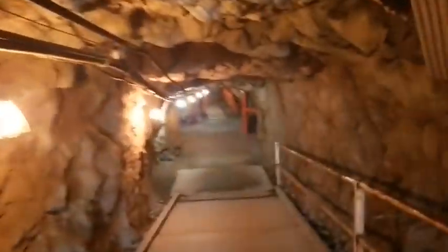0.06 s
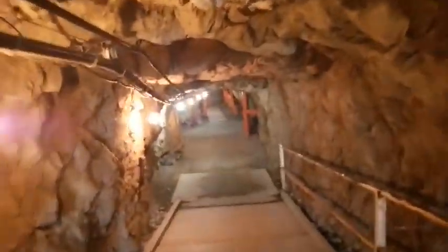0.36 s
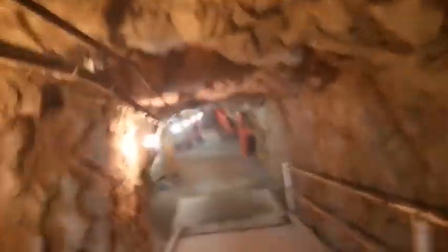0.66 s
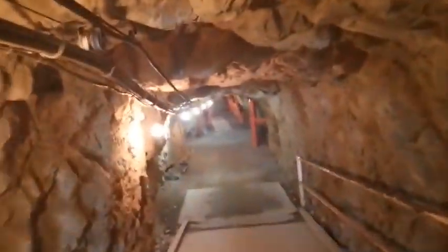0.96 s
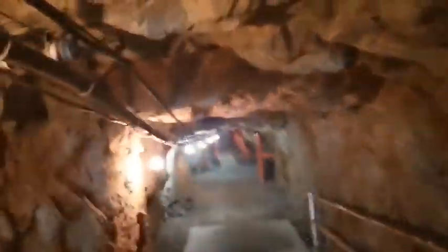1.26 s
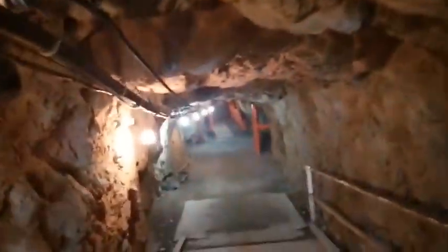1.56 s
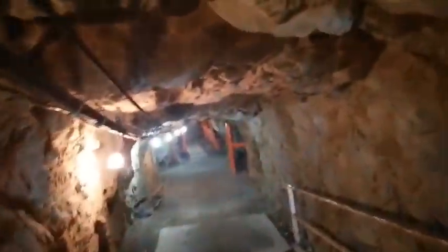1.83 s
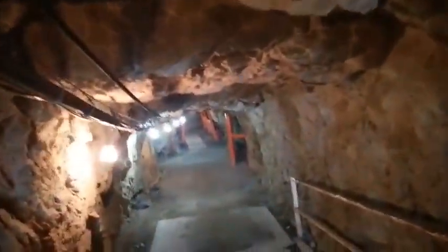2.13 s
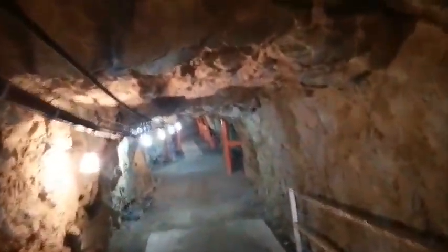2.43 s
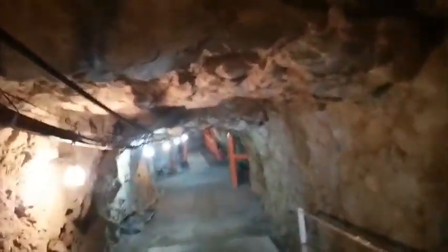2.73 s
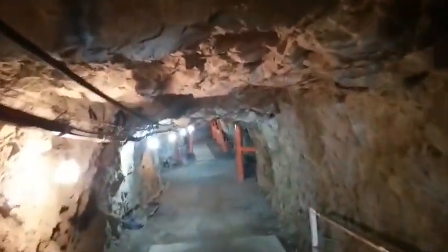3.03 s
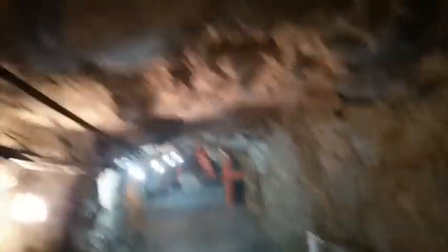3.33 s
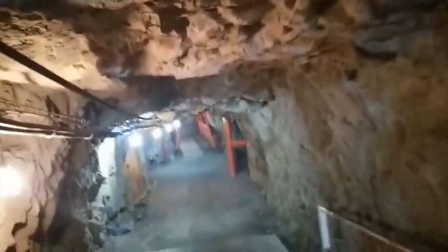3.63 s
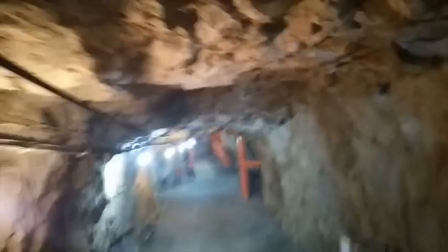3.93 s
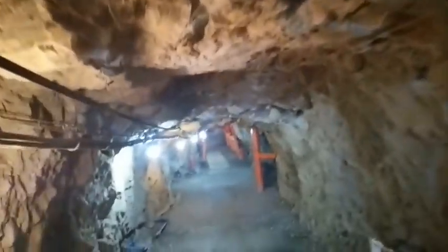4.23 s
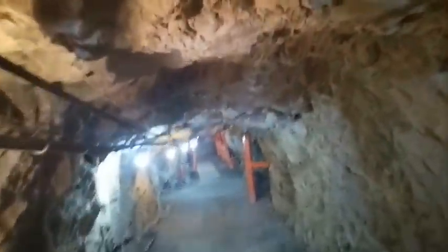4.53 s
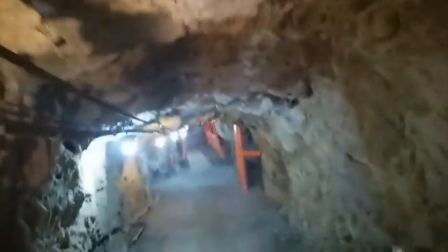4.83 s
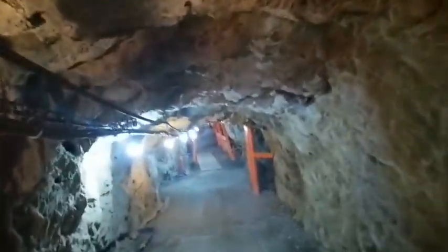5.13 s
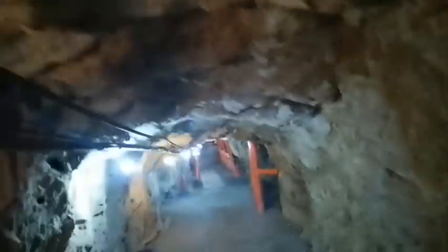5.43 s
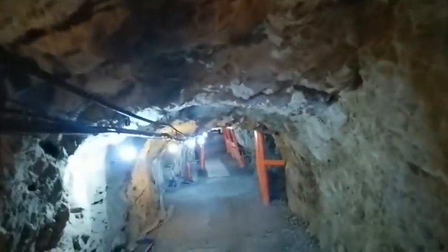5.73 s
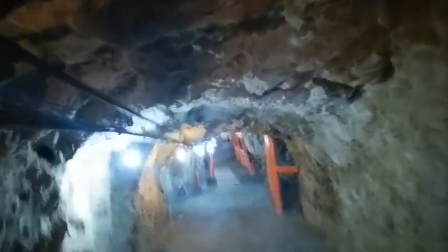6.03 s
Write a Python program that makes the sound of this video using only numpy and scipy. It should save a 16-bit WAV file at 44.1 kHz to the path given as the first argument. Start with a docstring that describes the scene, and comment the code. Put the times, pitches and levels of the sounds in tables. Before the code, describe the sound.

Heavy, fluttering handling rumble surges on a carried microphone in time with about nine footsteps going down a tunnel stairway. The steps thud dully and the treads clack, most sharply in the first half, with small gritty scrapes in between. A short reflection from the rock follows each step. Faint clothing swishes and a quiet, hollow wash of air lie underneath.

```python
"""Footsteps on tunnel stairs

Someone carrying a camera walks down stair treads in a rock tunnel. Each footfall thuds, treads clack,
soles scuff on grit and clothes rustle; the rock reflects the steps. Every stride shakes the camera:
the slow wobble overloads its left microphone, and a fast limiter chops the sound in time with it."""
import sys
import numpy as np
from scipy import signal
from scipy.fft import rfft, irfft
from scipy.io import wavfile
from scipy.ndimage import uniform_filter1d

SR = 44100
rng = np.random.default_rng(int(sys.argv[2]) if len(sys.argv) > 2 else 0)


def master_out(mix):
    """Clip the mix to full scale and print it as 16-bit PCM to the path in sys.argv[1]."""
    frames = np.transpose(np.atleast_2d(mix))
    ceiling = np.clip(frames, -1, 1)
    pcm = np.round(ceiling * 32767).astype(np.int16)
    wavfile.write(sys.argv[1], SR, pcm)


N = 268431
TIME = np.arange(N) / SR

# Weight landing on a foot. Each row: start in seconds, level in dB, pitch in Hz, decay in seconds.
FOOT_IMPACTS = [(0.509, -25.5, 84.2, 0.11), (0.597, -17, 114.5, 0.021), (1.161, -24, 101, 0.037),
                (1.772, -38, 118, 0.14), (1.889, -20, 124.5, 0.015), (2.491, -42.5, 104, 0.037),
                (2.616, -16, 97, 0.0074), (3.201, -8.5, 92, 0.0072), (3.256, -17, 97, 0.023),
                (3.886, -16, 89.7, 0.02), (3.992, -22, 115.6, 0.029), (4.115, -29, 108, 0.026),
                (4.552, -17.5, 84, 0.022), (4.641, -18, 84, 0.022), (5.258, -24, 106.1, 0.1),
                (5.997, -17.5, 97.5, 0.025)]
# A tread knocking on its frame. Each row: start in seconds, level in dB, crack decay in seconds,
# lower and upper band edges in Hz, left over right in dB.
TREAD_KNOCKS = [(0.597, -8, 0.0025, 170, 3100, -6.5), (0.605, -9.5, 0.002, 200, 3400, -1),
                (1.898, -9, 0.0032, 306, 2400, -0.5), (1.903, -8, 0.0046, 1180, 2470, -8.5),
                (1.96, -31, 0.011, 790, 2210, -12), (2.621, -27, 0.0021, 297, 2350, -10),
                (3.278, -10, 0.0058, 302, 2800, -5.5), (3.306, -16.5, 0.0095, 406, 3070, -2.5),
                (3.356, -25, 0.0045, 605, 2940, -1), (1.246, -20.5, 0.061, 247, 770, 8),
                (4.002, -21.5, 0.01, 250, 680, 1), (4.647, -22.5, 0.006, 200, 2600, -8),
                (4.708, -16, 0.00076, 385, 2860, 8), (5.345, -21.5, 0.036, 287, 830, 2.5)]
# The crack of a knock. Each row: frequency in Hz, spectral level in dB.
CRACK_SPECTRUM = [(200, 14.5), (400, 0.5), (650, -1), (1000, -7), (1700, 0), (2700, -5.5), (4000, -3),
                  (8000, -5)]
# Modes of a tread. Each row: frequency in Hz, level in dB, 60 dB decay time in seconds.
TREAD_MODES = [(355.4, 6.5, 0.15), (524, 1, 0.14), (631, 17, 0.099), (845, 3.5, 0.27), (1190, -37, 0.09),
               (1450, -36, 0.15), (1595, -34, 0.13), (1790, 1, 0.071), (1600, -34, 0.12), (1750, -4, 0.39),
               (1980, -18, 0.22), (2420, -16, 0.2), (2570, -15, 0.12), (2807, 9.5, 0.11), (3680, 10, 0.22)]
# Grit under a sole. Each row: start in seconds, level in dB, decay in seconds, resonance in Hz,
# treble trim in dB, left over right in dB.
GRIT_SCUFFS = [(0.226, -25, 0.003, 860, -8, -0.5), (0.524, -39, 0.029, 3100, -5, -17),
               (0.840, -34, 0.012, 3070, -6, -13.5), (0.902, -17, 0.00069, 1070, -13.5, -5.5),
               (1.5, -29.5, 0.0019, 2200, -5, -2), (1.541, -43.5, 0.015, 10600, -20, 6),
               (1.602, -45.5, 0.052, 2730, -12, -15), (1.687, -15, 0.0017, 2470, -27, -7.5),
               (1.745, -42, 0.02, 3570, -43, -14), (1.815, -8.5, 0.0031, 2460, 0, -8.5),
               (2.896, -21.5, 0.0035, 2770, 1, -5.5), (2.897, -29.5, 0.0065, 3630, -8, -21),
               (4.270, -59.5, 0.072, 3900, -18, -17), (4.429, -33.5, 0.011, 3670, 2, -12.5),
               (4.519, -47, 0.15, 2960, -33, -13.5), (5.306, -30, 0.0073, 3230, 4.5, -12.5),
               (5.311, -30.5, 0.019, 4260, 2.5, -7.5)]
# Small hard parts. Each row: start in seconds, level in dB, pitch in Hz, ring time in seconds.
PART_TICKS = [(0.739, -5.5, 7030, 0.004), (0.741, -7.5, 4080, 0.01)]
# Strides jolting the camera. Each row: start in seconds, swing in dB, rise in seconds,
# jolted and settling rates in Hz, fade in dB per second.
CAMERA_JOLTS = [(-0.174, -5.5, 0.21, 6.67, 7.4, 54.5), (0.301, -3.5, 0.13, 11.1, 10.3, 37.5),
                (0.484, 7.5, 0.13, 8.53, 8.35, 51.5), (1.191, 11.5, 0.0696, 10.85, 8.05, 94.5),
                (1.655, -12, 0.033, 9.7, 6, 27), (1.914, 0, 0.047, 8.8, 9.3, 50),
                (2.499, 2, 0.21, 7.76, 7.9, 195), (2.939, -11, 0.081, 9, 4.9, 350),
                (3.215, 4.5, 0.059, 10.1, 8.56, 37), (3.899, 6.5, 0.089, 9.5, 7.7, 76.5),
                (4.555, 8, 0.13, 9.72, 7.93, 71), (5.276, 11, 0.064, 10.1, 8.2, 92),
                (5.996, -5.5, 0.064, 8, 8, 65.5)]
# Fingers shifting on the camera. Each row: centre in seconds, level in dB, half length in seconds.
FINGER_SHIFTS = [(0.35, 7, 0.015), (1.66, -7.5, 0.037), (2.42, -6, 0.019), (3.07, -20, 0.018)]
# Rumble of the grip. Each row: frequency in Hz, spectral level in dB.
GRIP_SPECTRUM = [(5, -10.5), (20, 2), (40, -7.5), (70, -14.5), (120, -20.5), (200, -31.5), (400, -47),
                 (1500, -60), (6000, -100)]
# The legs passing each other. Each row: centre in seconds, level in dB, half length in seconds.
LEG_SWISHES = [(0.08, 5.5, 0.069), (0.27, 6.5, 0.14), (0.53, 11.5, 0.086), (1.576, 1.5, 0.24),
               (2.43, -1, 0.84), (2.75, 12.5, 0.12), (3.4, 0, 0.25), (4.29, 1.5, 0.39), (4.746, 10, 0.12),
               (5.07, 1, 0.12), (5.62, -0.5, 0.33)]
# Hollow bands of a swish. Each row: centre in Hz, width in Hz, level in dB.
HOLLOW_BANDS = [(2710, 560, -7), (5180, 550, -11)]
# Hiss of cloth. Each row: frequency in Hz, spectral level in dB.
CLOTH_SPECTRUM = [(500, -13), (950, -8), (1400, -14.5), (2000, -4.5), (2700, -4.5), (4100, -5.5),
                  (5350, -7.5), (6300, -7), (7800, 5), (10100, -3.5), (11900, -5.5), (15500, -14.5)]
# Direction of that hiss. Each row: frequency in Hz, left over right in dB.
CLOTH_BALANCE = [(1000, -21.5), (2500, -11.5), (4500, -14), (7500, -8), (10000, 0.5), (13000, 7)]
# Reverberation of the tunnel. Each row: frequency in Hz, 60 dB decay time in seconds.
TUNNEL_DECAY = [(100, 0.33), (300, 0.65), (800, 0.45), (2100, 0.39), (5500, 0.52), (12000, 0.39)]
# Wash of the tunnel air. Each row: frequency in Hz, spectral level in dB.
AIR_SPECTRUM = [(30, -27), (100, -6.5), (350, 5), (600, -3.5), (1000, -13), (2500, -18), (6000, -32),
                (15000, -31)]
# Likeness of the two microphones. Each row: frequency in Hz, coherence from 0 to 1.
MIC_COHERENCE = [(100, 0.97), (500, 0.61), (1000, 0.5), (2000, 0.24), (4000, 0.089)]


def footfalls():
    """Impact excitation: each foot drives a damped low boom, with a dull puff from the sole."""
    out, t = np.zeros(N), np.arange(SR // 3) / SR
    for s, db, hz, decay in FOOT_IMPACTS:
        boom = np.sin(2 * np.pi * hz * t)
        puff = unit_rms(band(rng.standard_normal(len(t)), 86, 178.4))
        sole = unit_rms(band(rng.standard_normal(len(t)), 420, 1020, order=1))
        push = (1 - np.exp(-(t / 0.0055) ** 2)) * np.exp(-t / decay)
        add(out, s, amp(db) * push * (0.92 * boom + amp(-6.5) * puff + amp(-29.5) * sole))
    return out


def tread_clacks():
    """Modal vibration: a tread hits its frame with a rattling crack and rings in its damped modes."""
    out, t = np.zeros((2, N)), np.arange(SR // 4) / SR
    colour = amp(curve(CRACK_SPECTRUM, np.fft.rfftfreq(len(t), 1 / SR)))
    for s, db, decay, low_hz, high_hz, pan_db in TREAD_KNOCKS:
        crack = irfft(rfft(mic_noise(len(t))) * colour, len(t)) * np.exp(-t / decay)
        phases = rng.uniform(0, 2 * np.pi, len(TREAD_MODES))
        ring = sum(amp(level) * 1e-3 ** (t / t60) * np.sin(2 * np.pi * hz * t + phase)
                   for (hz, level, t60), phase in zip(TREAD_MODES, phases))
        knock = 1.534 * crack + amp(-34.5) * np.array([-ring, ring])
        add(out, s, amp(db) * panned(pan_db) * band(knock, low_hz, high_hz, order=3))
    return out


def sole_scuffs():
    """Granular friction: uneven bursts of grit excite a broad resonance of the sole and a bright fizz."""
    out, t = np.zeros((2, N)), np.arange(SR // 3) / SR
    for s, db, decay, hz, treble_db, pan_db in GRIT_SCUFFS:
        grains = rng.standard_normal((2, len(t))) * amp(5.1 * rng.standard_normal(len(t)))
        grains = unit_rms(grains) * (1 - np.exp(-t / (0.54 * decay))) * np.exp(-t / decay)
        sole = band(grains, hz / 1.305, hz * 1.195)
        fizz = 0.33 * amp(treble_db) * band(grains, 3550, 9020, order=3)
        add(out, s, 4 * amp(db) * panned(pan_db) * (sole + fizz))
    return out


def part_ticks():
    """Free vibration: small hard parts ring briefly, close to the right microphone."""
    out, t = np.zeros(N), np.arange(SR // 10) / SR
    for s, db, hz, ring_s in PART_TICKS:
        envelope = (1 - np.exp(-t / 0.0001)) * 0.00078 ** (t / ring_s)
        add(out, s, amp(db) * envelope * np.sin(2 * np.pi * hz * t))
    return out * panned(-21.0) * amp(-6.5)


def camera_wobble(jolt_s=0.15, hold_s=0.1, handover_s=0.074, relax_s=0.75):
    """Damped oscillation: each jolt starts an infrasonic swing and a strain on the grip that relaxes."""
    swing, strain = np.zeros((2, N))
    next_jolts = [row[0] for row in CAMERA_JOLTS[1:]] + [TIME[-1]]
    for (s, db, rise_s, jolt_hz, settle_hz, fade_db_per_s), end in zip(CAMERA_JOLTS, next_jolts):
        age = np.maximum(TIME - s, 0)
        fade_db = fade_db_per_s * np.maximum(age - rise_s - hold_s, 0)
        width = np.minimum(age / rise_s, 1) ** 2 * amp(db - fade_db)
        width *= np.clip((end - TIME) / handover_s + 1, 0, 1)  # the next jolt stops this swing
        cycles = jolt_hz * np.minimum(age, jolt_s) + settle_hz * np.maximum(age - jolt_s, 0)
        swing += width * np.sin(2 * np.pi * cycles)
        strain += width * np.exp(-age / relax_s)
    return swing, strain


def camera_handling():
    """Structure-borne sound: the wobble and the grip's rumble reach mostly the left microphone."""
    swing, strain = camera_wobble()
    shared, right_only = unit_rms(coloured(rng.standard_normal((2, N)), GRIP_SPECTRUM))
    force = (0.16 + np.minimum(strain, 1.5) + swells(FINGER_SHIFTS)) * amp(3.64 * drift(hz=11))
    left = swing + amp(-18) * force * shared
    right = amp(-40.5) * swing + force * (amp(-50) * right_only - amp(-45.5) * shared)
    return np.array([left, right])


def cloth_rustle():
    """Friction noise: cloth rubs in an uneven hiss that swells and turns hollow as the legs pass."""
    hiss = unit_rms(coloured(rng.standard_normal((2, N)), CLOTH_SPECTRUM))
    hiss = np.array([coloured(channel, [(hz, side * db / 2) for hz, db in CLOTH_BALANCE])
                     for channel, side in zip(hiss, (1, -1))])
    rub = rng.standard_normal((2, N))
    hollow = sum(amp(db) * unit_rms(band(rub, hz - width / 2, hz + width / 2, order=1))
                 for hz, width, db in HOLLOW_BANDS)
    swish = swells(LEG_SWISHES)
    hiss *= np.hypot(amp(-1.5), swish)  # part of the hiss never stops
    hollow *= amp(-4) * panned(-14.5) * swish
    return (hiss + hollow) * amp(-57 + 1.8 * drift(hz=70))


def tunnel_echo(x):
    """Reverberation: dense reflections off close rough rock, each band dying at its own rate."""
    noise = mic_noise(SR) * [[-1], [1]]  # each channel keeps its polarity
    hz, t, bands = signal.stft(noise, SR, nperseg=256)
    decay = np.exp(-np.log(1000) * t / curve(TUNNEL_DECAY, hz)[:, None])
    tail = signal.istft(bands * decay, SR, nperseg=256)[1]
    t = np.arange(tail.shape[1]) / SR
    tail *= 1 - np.exp(-(t / 0.0066) ** 2)
    tail *= 1 + 2 * np.exp(-t / 0.013)  # the near walls answer first
    return signal.fftconvolve(x, tail / np.linalg.norm(tail[0]), axes=1)[:, :N]


def tunnel_air():
    """Stationary noise: the steady hollow wash of the tunnel."""
    return amp(-58) * unit_rms(coloured(mic_noise(N), AIR_SPECTRUM))


def mic_noise(size):
    """Partial coherence: noise at microphones of opposite polarity, mirrored in bass, not in treble."""
    right, unrelated = rfft(rng.standard_normal((2, size)))
    coherence = curve(MIC_COHERENCE, np.fft.rfftfreq(size, 1 / SR))
    left = -coherence * right + np.sqrt(1 - coherence ** 2) * unrelated
    return irfft(np.array([left, right]), size)


def swells(rows):
    """Amplitude of bell-shaped swells that add in power."""
    return np.sqrt(sum((amp(db) * np.exp(-((TIME - s) / half) ** 2 / 2)) ** 2 for s, db, half in rows))


def drift(hz):
    """Random fluctuation of rms 1."""
    points = rng.standard_normal(4096)
    return unit_rms(np.interp(TIME * hz, np.arange(len(points)), points))


def amp(db):
    """Decibels to gain."""
    return 10 ** (np.asarray(db) / 20)


def unit_rms(x):
    """Scales to rms 1."""
    return x / np.sqrt(np.mean(x ** 2) + 1e-20)


def curve(points, hz):
    """Interpolates a table on a log-frequency axis."""
    f, value = np.transpose(points)
    return np.interp(np.log(hz + 1), np.log(f + 1), value)


def coloured(x, spectrum):
    """Filters by a table of Hz and dB."""
    gain = amp(curve(spectrum, np.fft.rfftfreq(2 * N, 1 / SR)))
    return irfft(rfft(x, 2 * N) * gain)[..., :N]


def band(x, low_hz, high_hz, order=2):
    """Causal band-pass."""
    return signal.sosfilt(signal.butter(order, [low_hz, high_hz], "band", fs=SR, output="sos"), x)


def panned(db):
    """Channel gains for a level difference, left over right."""
    return amp([[db / 2], [-db / 2]])


def add(mix, s, sound):
    """Superposes a sound from s seconds on."""
    part = mix[..., max(round(s * SR), 0):][..., :sound.shape[-1]]
    part += sound[..., :part.shape[-1]]


def scene():
    """Superposition: the steps, their echo, ticks, clothes, air and the shaking camera."""
    thud, clack, scuff = footfalls(), tread_clacks(), sole_scuffs()
    thud = np.array([-1.7 * thud, thud])  # the left microphone is inverted and feels more of the jolt
    echo = tunnel_echo(amp(1.5) * thud + amp(0.5) * clack + amp(-3.0) * scuff)
    return thud + clack + scuff + echo + part_ticks() + cloth_rustle() + tunnel_air() + camera_handling()


def record(dry):
    """Overload: the input clips, one fast limiter turns both channels down, and a low-pass follows."""
    look_ahead_s, threshold, step_hz, cutoff_hz = 0.003, 0.272, 6000, 15700
    clipped = np.clip(dry, -1, 1)
    level = uniform_filter1d(abs(clipped), size=280, axis=1).max(0)
    ahead = np.interp(TIME + look_ahead_s, TIME, level)
    gain = (1 + (ahead / threshold) ** 4) ** (-1 / 4)
    # the gain moves in small steps, which adds a thin whistle whenever it changes fast
    sawtooth = sum(np.sin(2 * np.pi * k * step_hz * TIME) / (np.pi * k) for k in (1, 2))
    gain += amp(1.5) * np.gradient(gain) * SR / step_hz * sawtooth
    low_pass = signal.firwin(255, cutoff_hz, window=("kaiser", 8), fs=SR)
    return signal.oaconvolve(clipped * gain, low_pass[None], "same", axes=1)


dry = scene()
out = record(dry)
master_out(out)
```